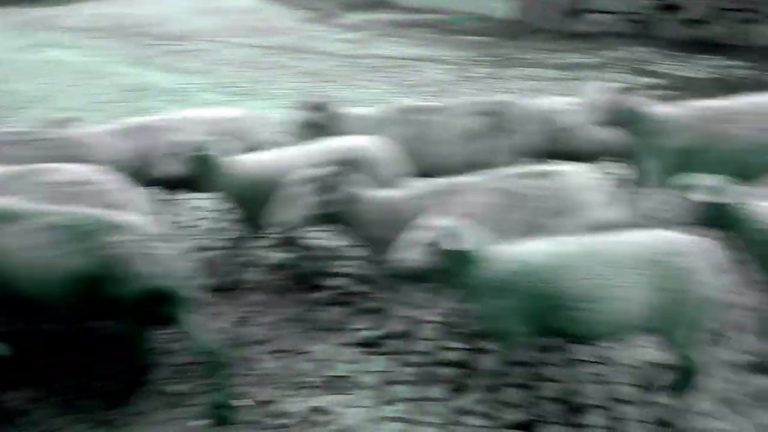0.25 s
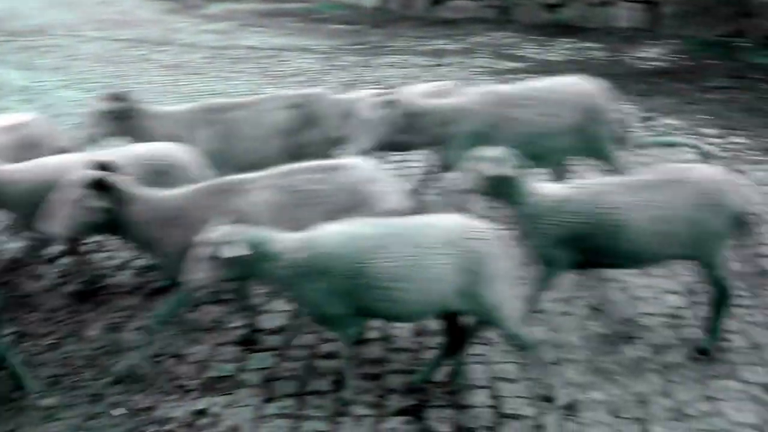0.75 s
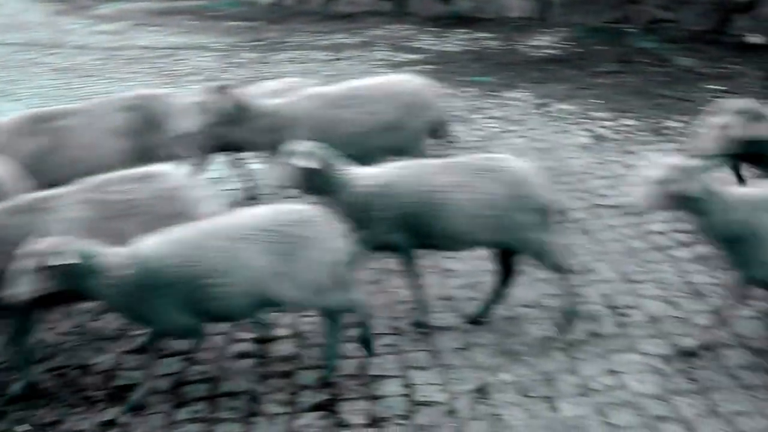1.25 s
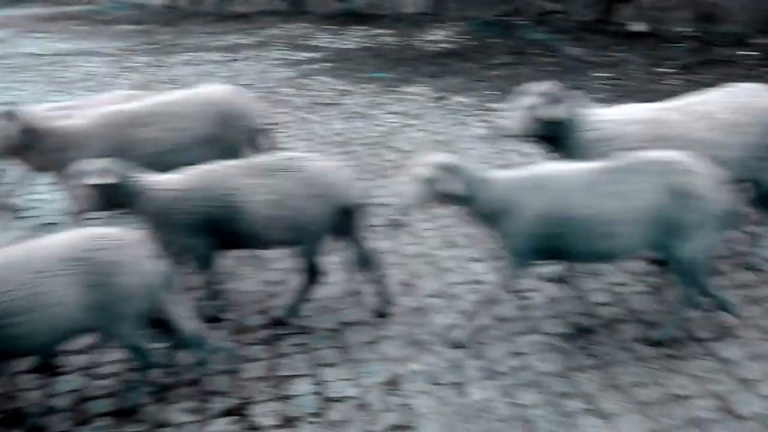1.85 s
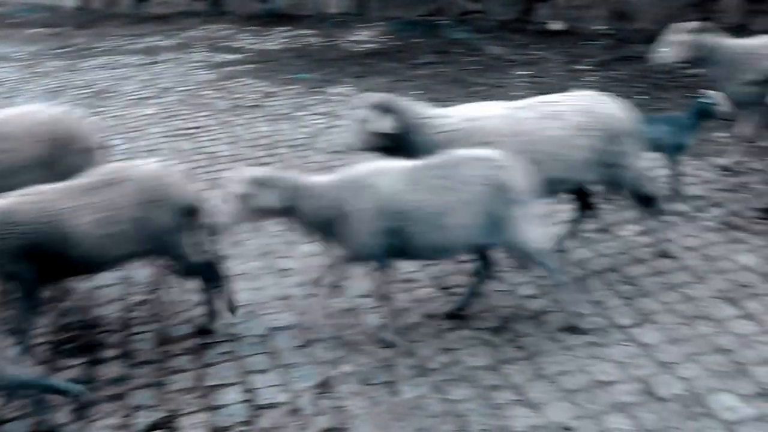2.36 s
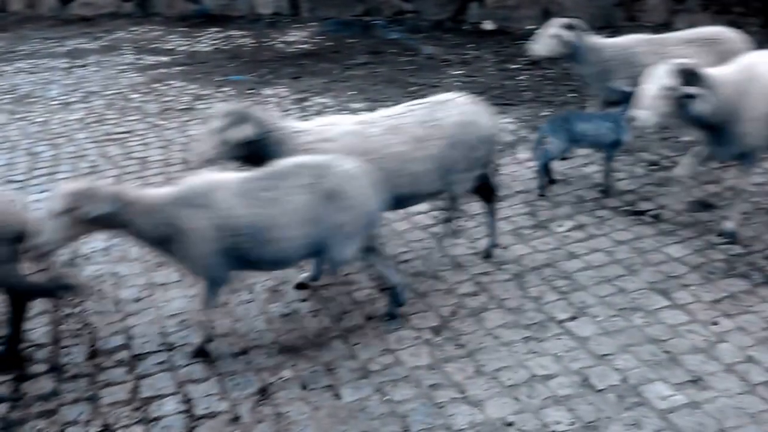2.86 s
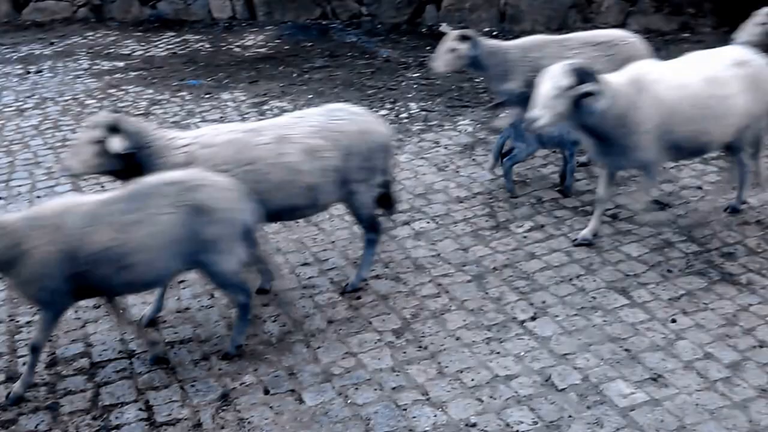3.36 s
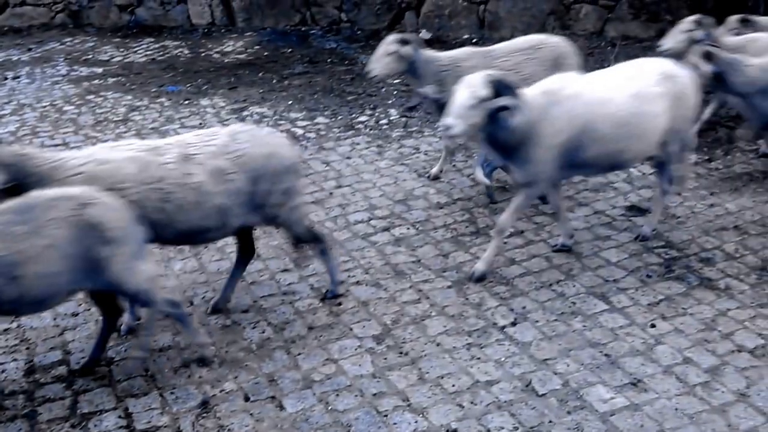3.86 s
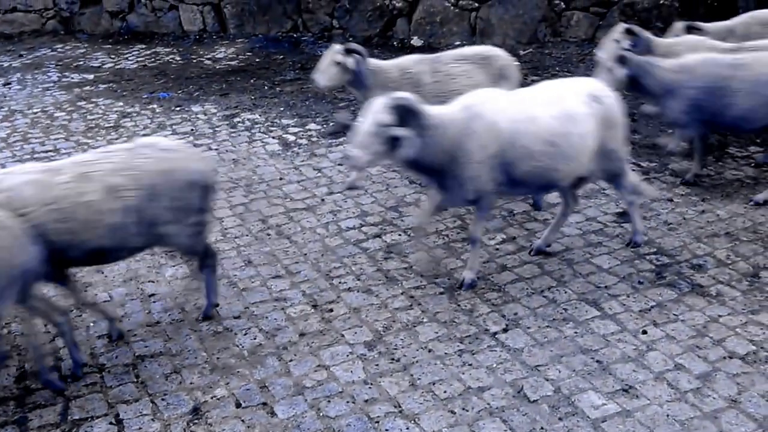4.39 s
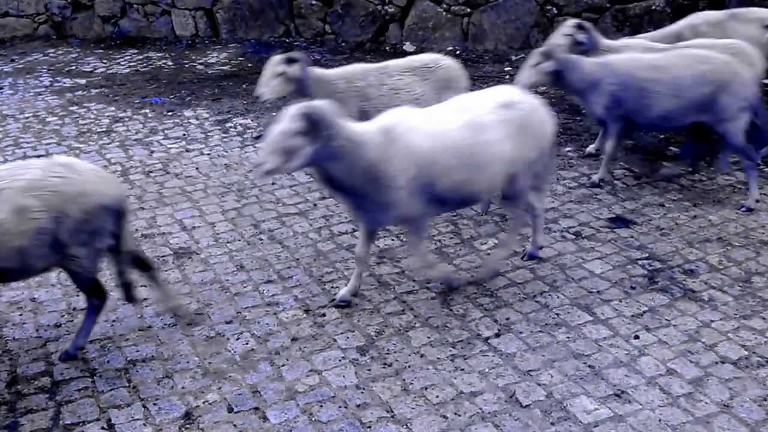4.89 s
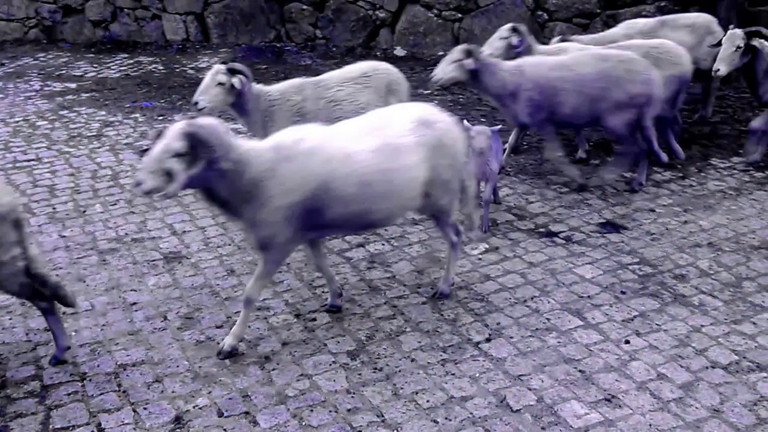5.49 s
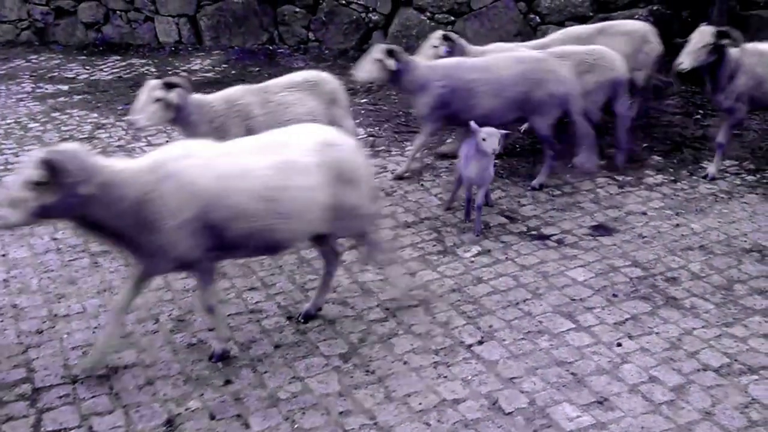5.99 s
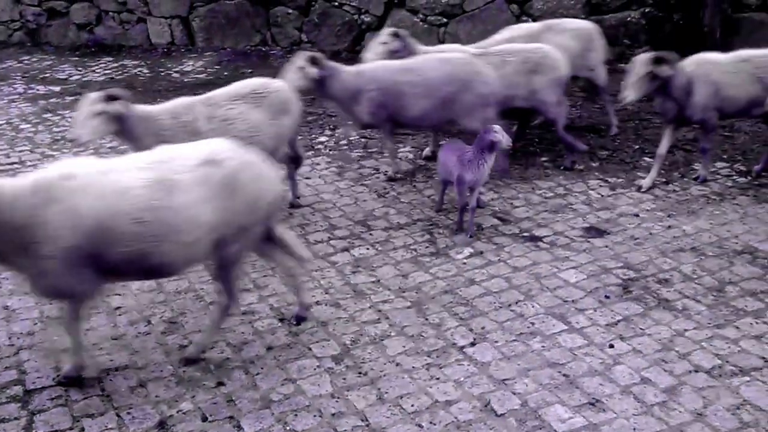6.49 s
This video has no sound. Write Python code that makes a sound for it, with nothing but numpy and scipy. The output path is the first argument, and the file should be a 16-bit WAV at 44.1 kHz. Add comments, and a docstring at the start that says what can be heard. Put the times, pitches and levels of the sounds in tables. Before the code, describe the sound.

Sheep bleat, one farther off and one loud and close, over hooves scuffing and clicking on gritty cobbles.

```python
"""Sheep call as the flock trots past the microphone on a cobbled lane beside a stone wall.
One ewe ends a low closed-mouth rumble, another quavers farther off, a third bleats loudly close by.
Each voice is vocal-fold pulses and breath ringing in throat, mouth or nose; wall and cobbles answer.
Underneath, hooves scuff over grit, crack single grains and now and then knock on the stones.
The open air rumbles faintly, and wind bumps the microphone once."""
import sys
import numpy as np
from scipy import signal
from scipy.fft import rfft, irfft
from scipy.io import wavfile
from scipy.ndimage import uniform_filter1d

SR = 44100
rng = np.random.default_rng(int(sys.argv[2]) if len(sys.argv) > 2 else 0)


def output_pcm(signal):
    """Save a mono or channel-first signal as 16-bit PCM at the path in sys.argv[1].

    Samples are clipped to [-1, 1] before scaling.
    """
    pcm = np.clip(np.atleast_2d(signal).T, -1, 1) * 32767
    wavfile.write(sys.argv[1], SR, np.round(pcm).astype(np.int16))


N = 297234
TIME = np.arange(N) / SR
BAND_LIMIT_HZ = 8300


# Effort of the ewe beside the microphone, as relative level: time_s, level_db
NEAR_EFFORT = [(4.635, -30), (4.669, -14), (4.711, -21.5), (4.773, -7.5), (4.867, -4), (5.243, -8),
               (5.303, -10), (5.401, -8), (5.525, -11), (5.543, -12), (5.627, -9), (5.849, -17),
               (5.885, -34)]
# Her pitch: time_s, pitch_hz
NEAR_PITCH = [(4.635, 141), (4.675, 146.4), (4.715, 158), (4.763, 168.3), (4.863, 180.8), (4.913, 192.3),
              (4.965, 182.5), (5.027, 193.2), (5.633, 186.9), (5.693, 181.3), (5.801, 181.3),
              (5.831, 176.6), (5.871, 152), (5.885, 148)]
# Her throat, heard close up: frequency_hz, gain_db
NEAR_THROAT = [(100, -60), (190, -24), (378, -17), (565, -11), (760, -18.5), (945, -10.5), (1130, -17.5),
               (1320, -8.5), (1520, -8.5), (1700, -7), (2100, -1), (2850, -1.5), (3450, -12.5),
               (4300, -11.5), (5200, -24), (8200, -24.5), (9500, -57)]

def near_bleat(break_s=4.912, break_width_s=.057, hoarse_s=.028, opening_s=.035):
    """A loud bleat starts hoarse, cracks atop its rise and settles; the mouth opens with effort."""
    times_s, effort_db = np.transpose(NEAR_EFFORT)
    t = np.arange(times_s[0], times_s[-1], 1 / SR)
    since, left = t - t[0], t[-1] - t
    level_db = np.interp(t, times_s, effort_db)
    pitch_hz = np.interp(t, *np.transpose(NEAR_PITCH))
    voice_break = np.exp(-((t - break_s) / break_width_s) ** 2)
    rough = .05 + .22 * voice_break + .25 * np.exp(-since / hoarse_s) + .2 * np.exp(-left / hoarse_s)
    mouth_hz = 2650 + 25 * (level_db - effort_db.max()) - 900 * np.exp(-since / opening_s)
    # after the break the voice quavers a little, less and less
    depth = .5 * np.clip((t - 5) / .05, 0, 1) * np.exp(-abs(t - 5) / .3)
    quaver = depth * quavering(t, crest_s=5.045)
    return gain_of(-1) * voice(
        t, pitch_hz, level_db, rough, mouth_hz, quaver, NEAR_THROAT,
        jitter=.002, rough_jitter=.045, rasp=.08, rough_rasp=.55, rasp_from_hz=1400,
        mouth_width_hz=750, mouth_db=.5, upper_db=-1.5, ring_db=-23.5, strain=2.4, brighten=.15)


# Throat of the ewe farther along the lane: frequency_hz, gain_db
FAR_THROAT = [(180, -33.5), (380, -23), (570, -4.5), (740, -11), (950, -14.5), (1330, -7), (1700, -4.5),
              (2500, 3.5), (3100, 2), (3500, -10), (4000, -13.5), (4800, -31), (6000, -19.5), (8200, -45.5),
              (9500, -62.5)]

def far_bleat(start_s=.835, end_s=1.92):
    """A farther bleat that quavers more and grows hoarser as it fades."""
    t = np.arange(start_s, end_s, 1 / SR)
    progress = np.linspace(0, 1, len(t))
    pitch_hz = pitch_arch(t, start_hz=145.1, top_hz=189.36, end_hz=141.5,
                          rise_s=.21, sag_hz=21.04, fall_s=.054)
    level_db = call_level(t, top_db=-13.5, attack_s=.13, fade_db=-14, release_s=.074, ends_db=-23.5)
    quaver = np.minimum(progress / .41, 1) * quavering(t, crest_s=1.087)
    rough = .04 + .33 * progress ** 1.3
    mouth_hz = 2680 - 230 * progress
    return voice(
        t, pitch_hz, level_db, rough, mouth_hz, quaver, FAR_THROAT,
        jitter=.003, rough_jitter=.04, rasp=.13, rough_rasp=1.5, rasp_from_hz=910,
        mouth_width_hz=1900, mouth_db=-1.5, upper_db=10.5, ring_db=6.5, strain=.12, brighten=.3)


# Nose of the ewe calling with her mouth closed: frequency_hz, gain_db
NOSE_SPECTRUM = [(40, -24), (70, -6.5), (135, -8), (210, -11.5), (340, 2.5), (430, -12), (610, -6.5),
                 (720, -0.5), (850, -26), (960, -8), (1100, -2.5), (1190, -8), (1330, -21.5), (3000, -31)]
# Its resonance as the rumble closes: time_s, resonance_hz
NOSE_RESONANCE = [(.17, 727), (.24, 390), (.41, 357), (.46, 117)]

def nasal_rumble(end_s=.56, start_hz=72, sag_hz_per_s=12, drop_hz=13):
    """A low, rattling call through the nose that sinks into a muffled grunt."""
    t = np.arange(0, end_s, 1 / SR)
    progress = t / end_s
    pitch_hz = start_hz - sag_hz_per_s * t - drop_hz * np.maximum(2 * progress - 1, 0) ** 2
    level_db = call_level(t, top_db=-29.5, attack_s=0, fade_db=-6.5, release_s=.075, ends_db=-12)
    rough = .14 + .34 * np.sin(np.pi * progress) ** 2
    nose_hz = np.interp(t, *np.transpose(NOSE_RESONANCE))
    call = voice(
        t, pitch_hz, level_db, rough, nose_hz, quaver=0, throat=NOSE_SPECTRUM,
        jitter=.004, rough_jitter=.05, rasp=.2, rough_rasp=.8, rasp_from_hz=33,
        mouth_width_hz=80, mouth_db=1.5, upper_db=-34, ring_db=-60, strain=0, brighten=0)
    muffled = np.interp(TIME, [.41, .47], [0, 1])
    return call * (1 - .75 * muffled) + 2.4 * muffled * resonate(call, hz=98, width_hz=38)


def voice(t, pitch_hz, level_db, rough, mouth_hz, quaver, throat, jitter, rough_jitter, rasp, rough_rasp,
          rasp_from_hz, mouth_width_hz, mouth_db, upper_db, ring_db, strain, brighten):
    """Vocal-fold pulses and a puff of air each cycle pass the throat and the moving mouth resonances."""
    rough = np.clip(rough, 0, 1)
    effort_db = level_db - np.median(level_db)
    # each crest of the quaver lifts pitch and level, firms the tone and swells the throat's low ring
    pitch_hz = pitch_hz * (1 + .027 * quaver)
    level_db = level_db + quaver
    firmness, ring_gain = gain_of(2.5 * quaver), gain_of(ring_db + 7 * quaver)
    # a slight tremble and uneven cycles smear the high harmonics first
    tremble = .0025 * wander(len(t), 18)
    uneven = (jitter + rough_jitter * rough) * wander(len(t), pitch_hz.mean())
    cycles = np.cumsum(pitch_hz * (1 + tremble + uneven)) / SR
    harmonics = range(1, int(BAND_LIMIT_HZ / pitch_hz.mean()) + 4)
    folds = unit_rms(sum(np.cos(2 * np.pi * k * cycles) for k in harmonics))
    puffs = (.5 + np.exp(-(cycles % 1) / .05)) * rng.standard_normal(N)[:len(t)]
    puffs = unit_rms(signal.sosfilt(highpass(2, rasp_from_hz), puffs))
    sound = colour(firmness * (1 - rough) * folds + (rasp + rough_rasp * rough) * puffs, throat)
    mouth = resonate(resonate(sound, mouth_hz, mouth_width_hz), mouth_hz, mouth_width_hz)
    upper = resonate(sound, 2 * mouth_hz, mouth_width_hz)
    ring = resonate(sound, hz=585, width_hz=130)
    sound = sound + gain_of(mouth_db) * mouth + gain_of(upper_db) * upper + ring_gain * ring
    # a loud or strained voice is brighter
    high, top = (signal.sosfiltfilt(highpass(3, hz), sound) for hz in (1400, 4000))
    sound = sound + (gain_of(brighten * effort_db) - 1) * high + strain * rough * (high + top)
    levelled = sound / np.sqrt(uniform_filter1d(sound ** 2, size=2048) + 1e-12)
    # a rough voice also shakes in strength
    strength = gain_of(level_db + 4 * rough * wander(len(t), 50))
    out = np.zeros(N)
    add(out, t[0], levelled * strength * signal.windows.tukey(len(t), .015))
    return out


def pitch_arch(t, start_hz, top_hz, end_hz, rise_s, sag_hz, fall_s):
    """Pitch of a call: it climbs, sags ever faster as the effort fades, and drops at the end."""
    since, left = t - t[0], t[-1] - t
    hz = start_hz + (top_hz - start_hz) * np.sin(np.pi / 2 * np.minimum(since / rise_s, 1))
    hz = hz - sag_hz * (since / since[-1]) ** 3
    return end_hz + (hz - end_hz) * np.minimum(left / fall_s, 1)


def call_level(t, top_db, attack_s, fade_db, release_s, ends_db):
    """Level of a call in dB: attack, a slowly fading hold, release."""
    since, left = t - t[0], t[-1] - t
    shut = np.maximum(1 - since / (attack_s + 1e-6), 0) + np.maximum(1 - left / release_s, 0)
    return top_db + fade_db * since / since[-1] + ends_db * shut


def quavering(t, crest_s, rate_hz=7):
    """The regular shake of a bleat, between -1 and 1."""
    return np.cos(2 * np.pi * rate_hz * (t - crest_s))


# Grit on the cobbles, under every hoof: frequency_hz, gain_db
GRIT_SPECTRUM = [(150, -23.5), (500, -27), (1100, -17.5), (1600, -10.5), (2250, -4), (2950, 7), (3500, 4.5),
                 (4100, 4.5), (5000, -6), (6000, 2), (8100, 2), (9500, -81)]
# Single steps passing the microphone: middle_s, length_s, level_db, brightness_db
HOOF_STEPS = [(.344, 0.088, -25, 3.5), (0.695, 0.062, -32.5, -8), (0.842, 0.028, -27, 5),
              (1.058, .028, -18.5, 9), (1.673, .03, -17.5, -5), (1.832, 0.12, -25, -1),
              (2.167, .03, -23, 32), (2.297, 0.033, -21, 10), (2.411, 0.033, -24.5, 24),
              (2.636, 0.02, -29, -2), (2.731, 0.021, -26.5, 5), (2.798, 0.072, -21, 3),
              (2.928, 0.13, -26.5, 2.5), (3.018, .03, -27, 11), (3.152, 0.089, -30.5, 2.5),
              (3.668, 0.1, -26, 9), (3.833, 0.071, -24.5, 13), (4, 0.046, -28.5, 3),
              (4.08, 0.033, -25, -16), (4.127, 0.079, -29, -6), (4.428, 0.05, -21.5, -4),
              (5.946, 0.063, -25.5, -25), (6.097, 0.072, -27, -3.5), (6.3, 0.032, -22.5, -5),
              (6.505, 0.039, -26, 3), (6.688, 0.051, -23.5, 10)]

def hoof_scuffs():
    """Hooves drag grit over stone: a light drag hisses, a firm tread sounds the hollow horn."""
    out = np.zeros(N)
    grains = grit(grains_per_s=8300, spread_db=4)
    crunch = unit_rms(colour(grains, GRIT_SPECTRUM))
    hiss = signal.sosfiltfilt(highpass(3, 5000), crunch)
    body = crunch - hiss
    horn = unit_rms(resonate(resonate(grains, hz=2150, width_hz=1000), hz=2150, width_hz=1000))
    for middle_s, length_s, level_db, brightness_db in HOOF_STEPS:
        span = abs(TIME - middle_s) < length_s
        hollow = gain_of(-16 - brightness_db) * horn[span]
        scuff = body[span] + gain_of(brightness_db) * hiss[span] + hollow
        # the hoof bites quickly and slides to rest
        since = TIME[span] - (middle_s - length_s / 2)
        stroke = np.clip(since / (.3 * length_s), 0, 1) * np.exp(-abs(since / length_s) ** 3)
        out[span] += gain_of(level_db) * unit_rms(scuff) * stroke
    return out


def hoof_thuds():
    """The weight of each step gives a soft, low bump."""
    steps = sum(gain_of(level_db - .5 * brightness_db) * np.exp(-((TIME - middle_s) / .021) ** 2)
                for middle_s, _, level_db, brightness_db in HOOF_STEPS)
    light_treads = gain_of(-39.5 + 10.2 * wander(N, 11))
    low_band = signal.butter(1, [90, 300], "band", fs=SR, output="sos")
    bump = unit_rms(signal.sosfilt(low_band, rng.standard_normal(N)))
    return gain_of(-35) * (steps + light_treads) * bump


# Hooves striking the stones of the lane: start_s, peak_db, hollow_db (relative)
HOOF_KNOCKS = [(2.832, -13.5, -44), (2.9226, -19.5, -14), (5.9379, -18, -14), (5.982, -11.5, -16),
               (6.0148, -12.5, -9), (6.027, -12, -14), (6.1731, -8.5, -16.5), (6.2787, -5.5, -26),
               (6.4745, -17, -12), (6.712, -12.5, -29)]

def hoof_knocks(ring_hz=2725):
    """A hoof strikes with a sharp tick and rings briefly in three damped modes."""
    out, t = np.zeros(N), TIME[:SR // 25]
    for start_s, peak_db, hollow_db in HOOF_KNOCKS:
        noise = rng.standard_normal(len(t))
        hoof_hz = ring_hz * (1 + .025 * noise[-1])
        modes = [(hoof_hz, 0, .017), (.68 * hoof_hz, hollow_db + 11.5, .018), (4400, -7, .012)]
        ring = sum(gain_of(db - 60 * t / t60_s) * np.sin(2 * np.pi * hz * t) for hz, db, t60_s in modes)
        tick = .15 * colour(noise, GRIT_SPECTRUM) * np.exp(-t / .0069)
        blow = ring * (1 - np.exp(-t / .002)) + tick
        add(out, start_s, gain_of(peak_db) * blow / abs(blow).max())
    return out


# Single grains cracking between hoof and cobble: start_s, peak_db
GRIT_CRACKS = [(.644, -16), (1.9984, -12.5), (2.2934, -12), (2.405, -18), (2.634, -25), (2.646, -8),
               (2.8103, -7.5), (3.445, -18), (3.828, -12.5), (4.556, -20), (6.6987, -10)]

def grit_cracks():
    """A grain bursts in a snap a millisecond or two long."""
    out, t = np.zeros(N), TIME[:SR // 50]
    for start_s, peak_db in GRIT_CRACKS:
        snap = colour(rng.standard_normal(len(t)) * np.exp(-t / .001), GRIT_SPECTRUM)
        add(out, start_s, gain_of(peak_db) * snap / abs(snap).max())
    return out


# The whole flock moving along the lane: time_s, level_db
FLOCK_SHUFFLE = [(0, -36.5), (.8, -35), (1, -28), (2.1, -30), (3.1, -33), (3.36, -39.5), (3.6, -32.5),
                 (4.05, -32.5), (4.3, -35.5), (6.35, -30.5), (6.62, -40.5), (6.74, -32.5)]

def flock_shuffle():
    """Many light steps overlap into an uneven crunching."""
    level_db = np.interp(TIME, *np.transpose(FLOCK_SHUFFLE)) + 2.6 * wander(N, 35)
    crunch = colour(grit(grains_per_s=4500, spread_db=4.5), GRIT_SPECTRUM)
    return gain_of(level_db) * unit_rms(crunch)


def grit(grains_per_s, spread_db):
    """A crowd of tiny clicks, a few of them much larger than the rest."""
    struck = rng.random(N) < grains_per_s / SR
    polarity = np.sign(rng.standard_normal(N))
    sizes = gain_of(spread_db * np.minimum(rng.exponential(1, N), 3))
    return polarity * sizes * struck


# Paths to the microphone off cobbles and wall: delay_ms, drift_ms_per_s, level_db (relative)
ECHO_PATHS = [(1.3, 0.098, -17), (7.4, -0.58, -8.5), (17, 0.34, -27)]

def walking_echoes(call, middle_s, gain_db):
    """The echo paths change length as the sheep walks, so single overtones swell and fade in turn."""
    out = call.copy()
    for delay_ms, drift_ms_per_s, level_db in ECHO_PATHS:
        delay_s = (delay_ms + drift_ms_per_s * (TIME - middle_s)) / 1000
        out += gain_of(level_db + gain_db) * np.interp(TIME - delay_s, TIME, call)
    return out


def lane_scatter(sound, wet_db, t60_s):
    """Adds the scatter from cobbles and wall: a short, dense, dying tail."""
    t = TIME[:SR // 2]
    tail = rng.standard_normal(len(t)) * gain_of(-60 * t / t60_s) * (t > .003)
    return sound + gain_of(wet_db) * signal.fftconvolve(sound, tail / np.linalg.norm(tail))[:N]


# Open air around the microphone: frequency_hz, gain_db
AIR_SPECTRUM = [(10, 0), (35, 0), (85, -10), (180, -16), (350, -21), (700, -25), (8000, -36)]

def open_air(gust_s=6.24, rise_s=.029, decay_s=.05):
    """A faint outdoor rumble, and one bump of wind on the microphone."""
    level_db = -54.5 + 1.5 * wander(N, 1.7)
    rumble = gain_of(level_db) * unit_rms(colour(rng.standard_normal(N), AIR_SPECTRUM))
    gust = np.exp(-np.maximum((gust_s - TIME) / rise_s, (TIME - gust_s) / decay_s))
    return rumble + gain_of(-35) * gust * wander(N, 61)


def gain_of(db):
    """Decibels to amplitude."""
    return 10 ** (np.asarray(db) / 20)


def unit_rms(x):
    """Scales to unit rms."""
    return x / np.sqrt(np.mean(x ** 2) + 1e-20)


def add(mix, start_s, sound):
    """Adds a sound into the mix at start_s."""
    part = mix[max(0, round(start_s * SR)):][:len(sound)]
    part += sound[:len(part)]


def highpass(order, hz):
    """Sections of a high-pass filter."""
    return signal.butter(order, hz, "high", fs=SR, output="sos")


def colour(x, spectrum, size=4096):
    """Causal filter with the given spectrum: it rings after each pulse, never before."""
    hz, db = np.transpose(spectrum)
    bins_hz = abs(np.fft.fftfreq(size, 1 / SR))
    log_gain = np.log(gain_of(np.interp(np.log(bins_hz + 1), np.log(hz + 1), db)))
    response = np.fft.ifft(np.exp(np.conj(signal.hilbert(log_gain)))).real
    return signal.fftconvolve(x, response[:size // 2])[:len(x)]


def resonate(x, hz, width_hz):
    """A resonance of gain 1 that may follow a curve."""
    carrier = np.exp(2j * np.pi * np.cumsum(hz * np.ones(len(x))) / SR)
    pole = np.exp(-np.pi * width_hz / SR)
    return 2 * (carrier * signal.lfilter([1 - pole], [1, -pole], x / carrier + 1e-18)).real


def wander(count, rate_hz):
    """A smooth random curve of unit size, changing up to about rate_hz times a second."""
    rolloff = np.exp(-(np.fft.rfftfreq(N, 1 / SR) / rate_hz) ** 2)
    return unit_rms(irfft(rfft(rng.standard_normal(N)) * rolloff, N))[:count]


def scene():
    """Three voices over hooves and open air, in mono; the farther bleat draws more from the lane."""
    hooves = hoof_scuffs() + flock_shuffle() + hoof_knocks() + grit_cracks() + hoof_thuds()
    hooves = lane_scatter(hooves, wet_db=-13, t60_s=.16)
    near = walking_echoes(near_bleat(), middle_s=5.3, gain_db=-3)
    far = walking_echoes(far_bleat(), middle_s=1.26, gain_db=-7)
    voices = lane_scatter(near, wet_db=1, t60_s=.09) + lane_scatter(far, wet_db=2, t60_s=.11)
    voices += lane_scatter(nasal_rumble(), wet_db=-2, t60_s=.1)
    return (voices + hooves + open_air())[None]


def record(dry):
    """The close bleat overloads the microphone softly; the top treble is cut off."""
    ceiling = .9
    squashed = dry / (1 + (dry / ceiling) ** 6) ** (1 / 6)
    lowpass = signal.firwin(1023, BAND_LIMIT_HZ, window=("kaiser", 9), fs=SR)
    return signal.oaconvolve(squashed, lowpass[None], "same")


dry = scene()
out = record(dry)
output_pcm(out)
```